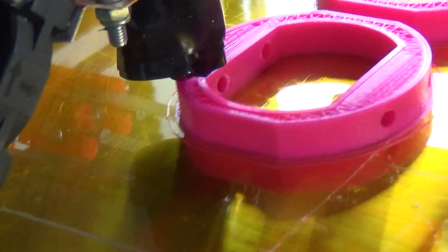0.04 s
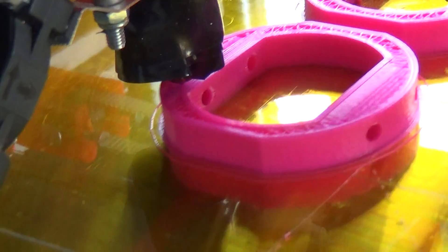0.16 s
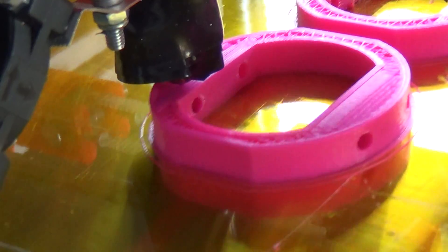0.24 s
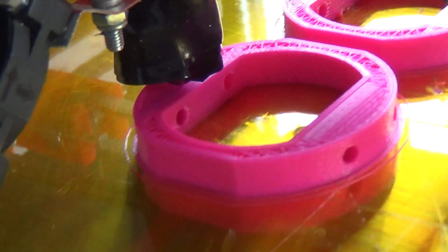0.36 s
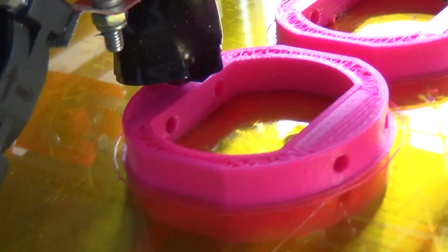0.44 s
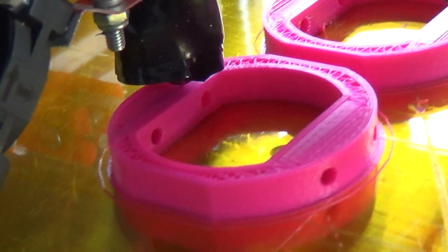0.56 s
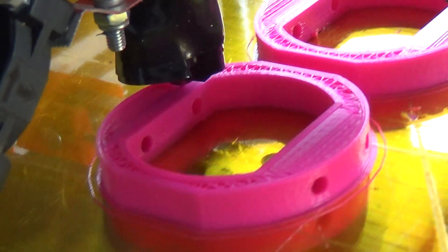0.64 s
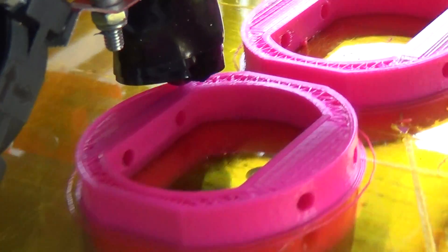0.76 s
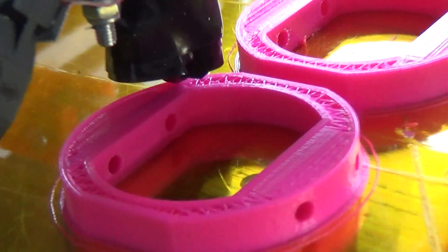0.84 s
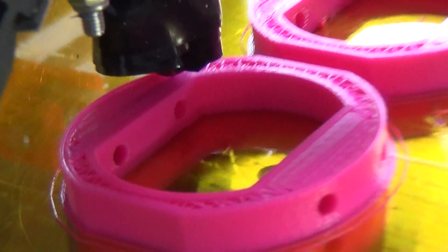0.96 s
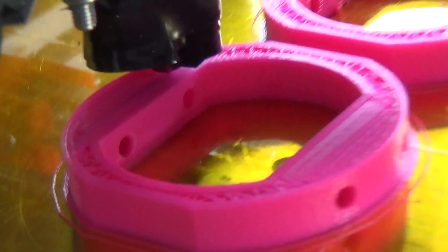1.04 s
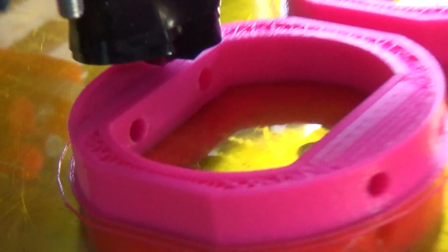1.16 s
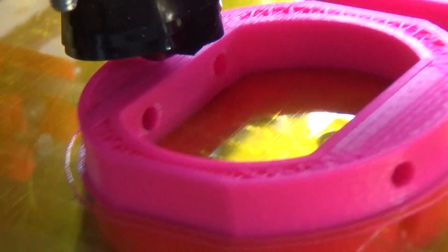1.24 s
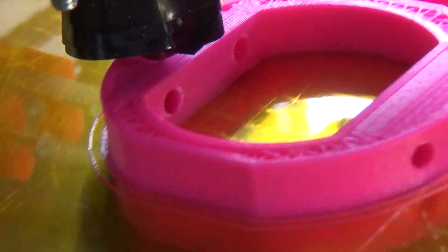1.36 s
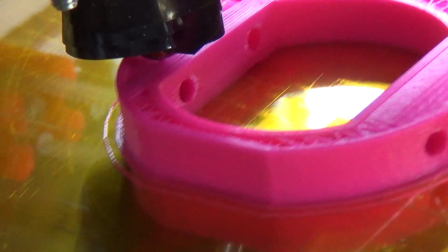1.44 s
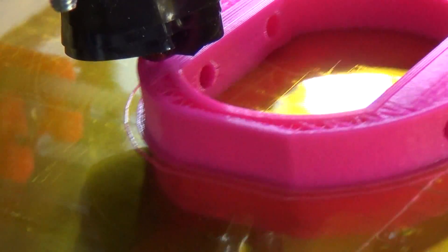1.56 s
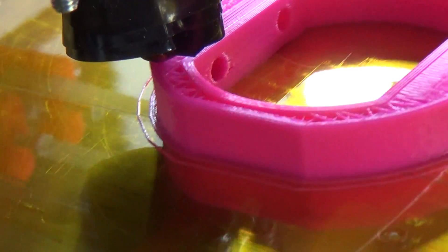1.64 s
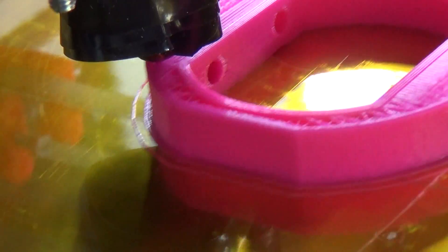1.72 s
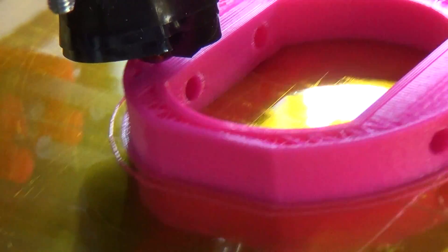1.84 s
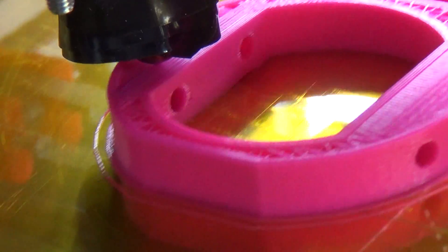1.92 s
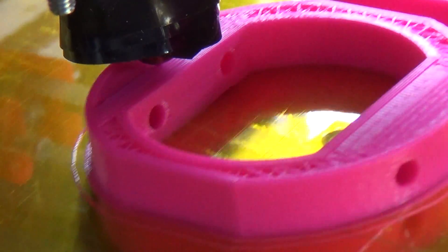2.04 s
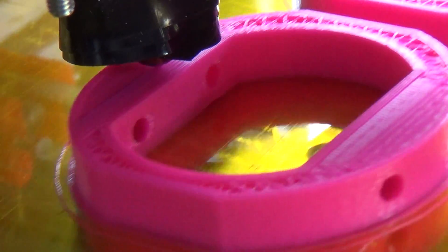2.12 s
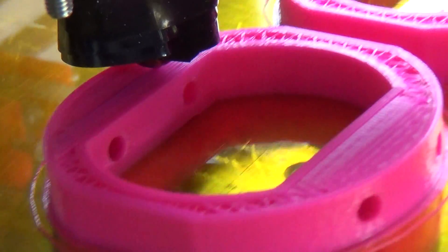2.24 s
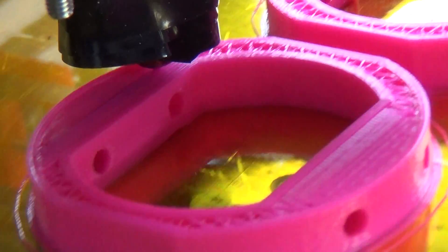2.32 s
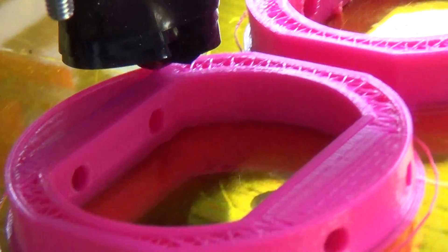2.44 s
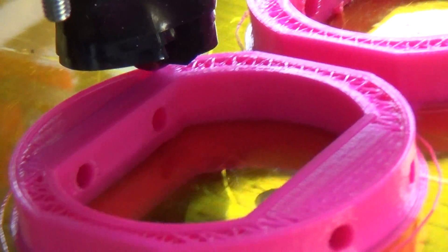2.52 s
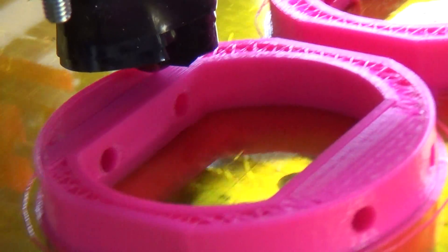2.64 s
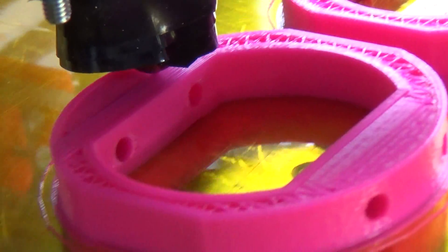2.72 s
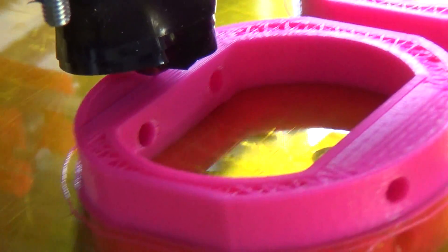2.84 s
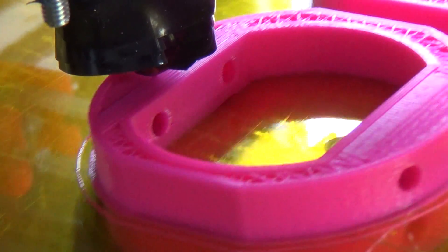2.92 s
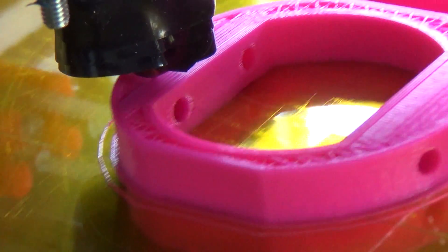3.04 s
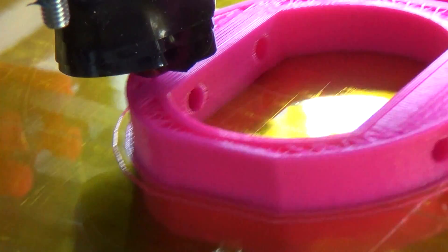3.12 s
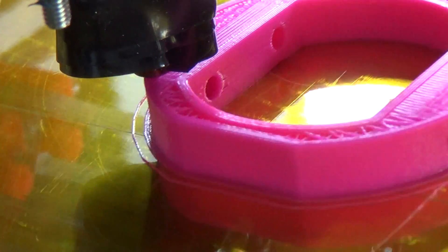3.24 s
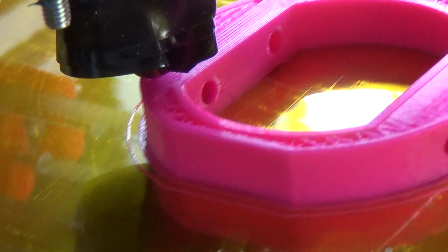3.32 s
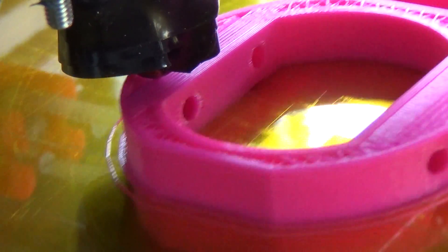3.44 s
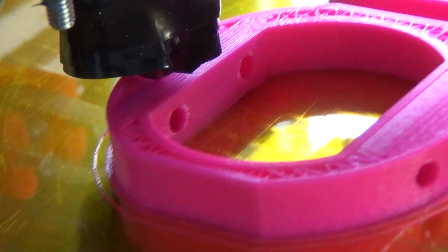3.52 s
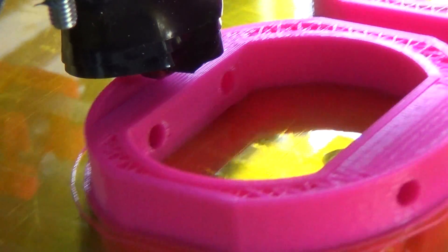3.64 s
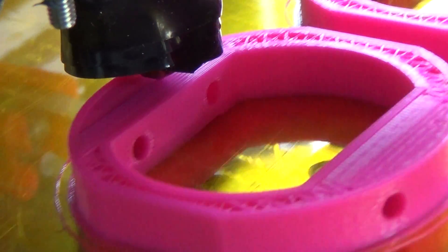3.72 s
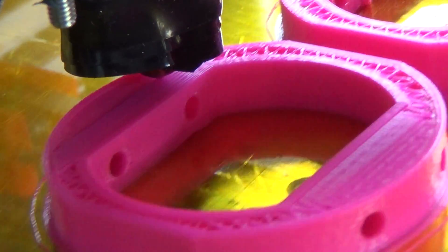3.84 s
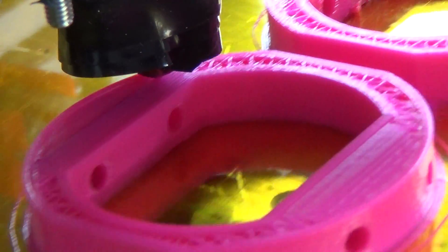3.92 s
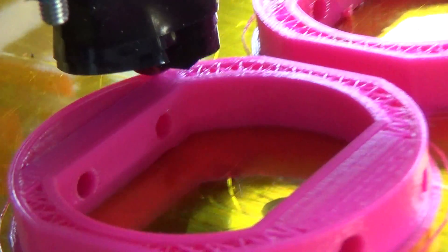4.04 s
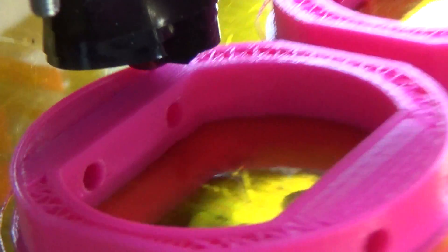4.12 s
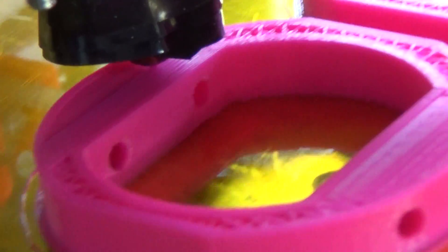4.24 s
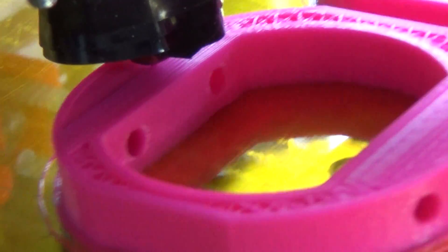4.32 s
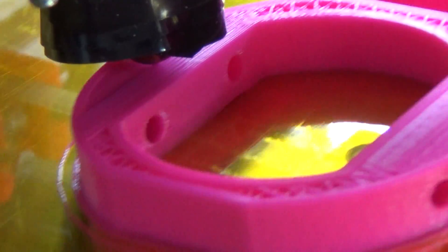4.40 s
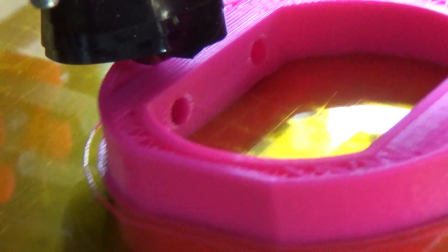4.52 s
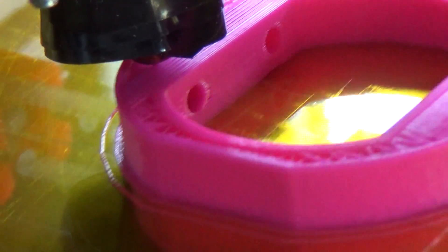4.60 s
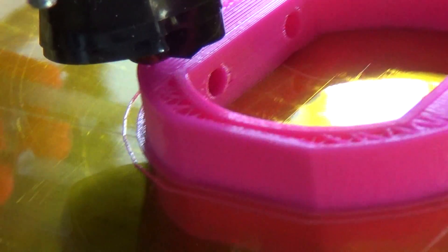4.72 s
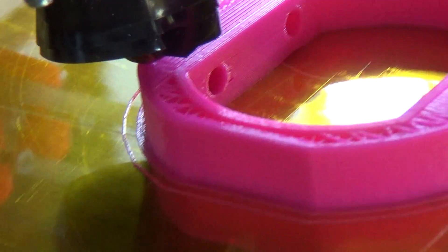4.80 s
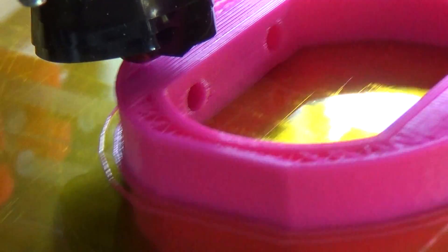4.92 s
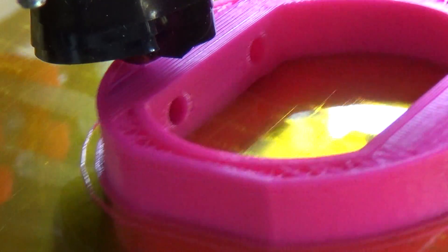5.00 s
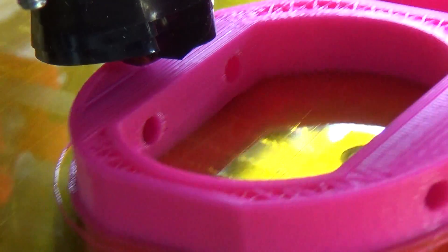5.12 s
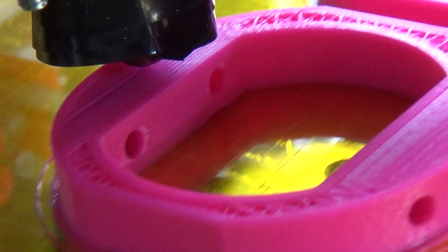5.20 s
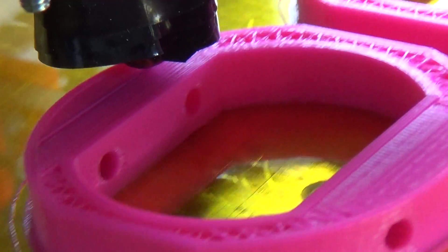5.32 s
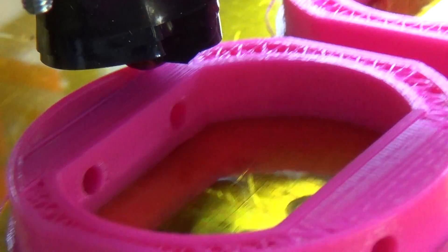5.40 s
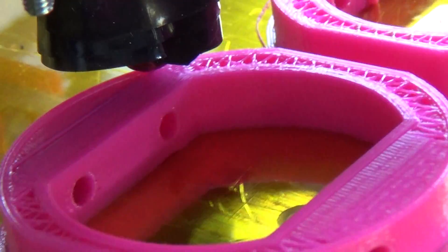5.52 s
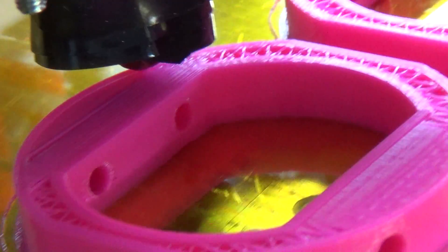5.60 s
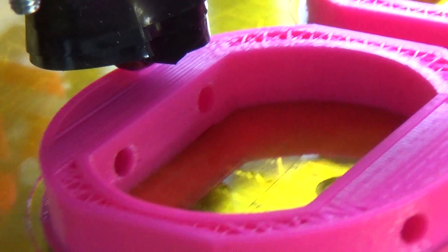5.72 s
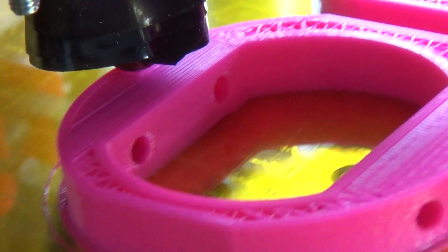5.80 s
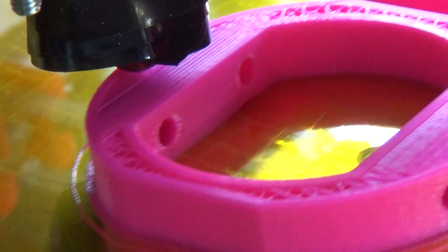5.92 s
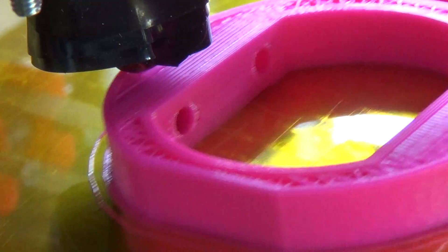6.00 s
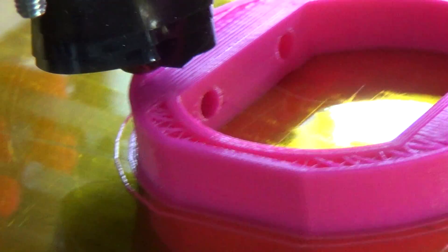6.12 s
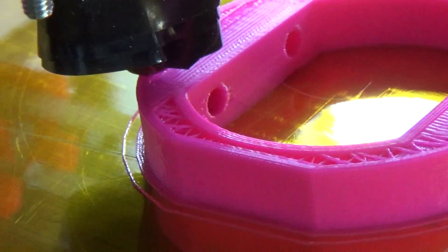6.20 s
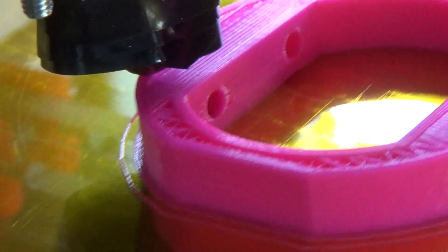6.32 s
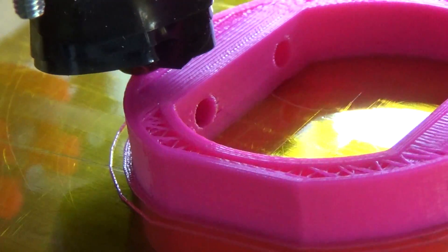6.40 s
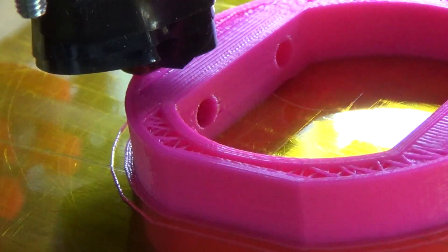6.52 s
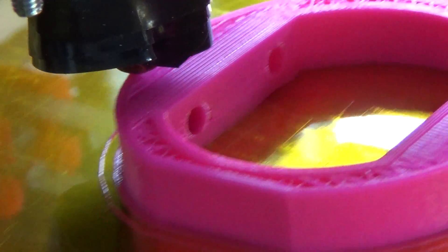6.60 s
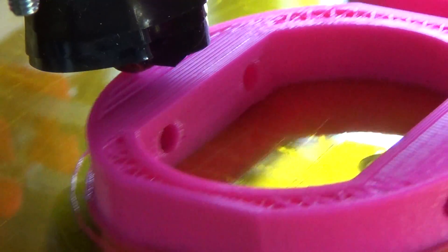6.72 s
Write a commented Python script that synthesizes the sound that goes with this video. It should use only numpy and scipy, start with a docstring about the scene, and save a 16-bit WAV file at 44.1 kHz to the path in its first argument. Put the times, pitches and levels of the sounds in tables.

```python
"""A 3D printer up close

A stepper motor whines through long strokes, gliding down and up in pitch at each turn and shaking the
frame. Near the end come short zigzags and two fast travel moves, the first ending in a clack.
Small metal parts tick; under it all are the rush of the belt, a fine crackle and a hissing fan."""
import sys
import numpy as np
from scipy import signal
from scipy.fft import rfft, irfft
from scipy.io import wavfile
from scipy.ndimage import uniform_filter1d

SR = 44100
rng = np.random.default_rng(int(sys.argv[2]) if len(sys.argv) > 2 else 0)


def generate_wav(sig):
    """Save sig (samples, or channels by samples) to the path in sys.argv[1] as 16-bit PCM at SR."""
    pcm = np.round(np.clip(np.atleast_2d(sig).T, -1, 1) * 32767).astype(np.int16)
    wavfile.write(sys.argv[1], SR, pcm)


N = 297675
T = np.arange(N) / SR
BINS = np.fft.rfftfreq(N, 1 / SR)
CRUISE_HZ = 1455.7  # the motor's step rate at cruising speed
SPURT_PER_S = 12  # share of cruising speed gained per second in a zigzag

# long strokes, out and back by turns: at speed t/s, braking t/s, whine level/dB, hum level/dB
LONG_STROKES = [(0.125, .817, 0.5, 1), (0.969, 1.642, -0.2, 1), (1.79, 2.448, 0, 2),
                (2.605, 3.231, -0.5, 0), (3.382, 3.998, 0.4, 2.5), (4.153, 4.745, -0.5, 0.5),
                (4.918, 5.473, -2.5, -2), (5.702, 6.137, -1, 0), (6.676, 7.3, 0, 2.5)]
# how each stroke out, and each stroke back, swells and fades along the rail:
# share of the stroke, whine level/dB, hum level/dB, whine left minus right level/dB
SWELL_OUT = [(0, -30, -43, -2), (.05, -26.5, -43.5, 0), (.14, -31, -40.5, 2.5), (.22, -30.5, -40, 1.7),
             (.46, -28.5, -38, 1.2), (.7, -31, -36.5, 2.7), (.85, -35.5, -38, 4.5), (.95, -41, -37.5, 7),
             (1, -35, -40.5, 5)]
SWELL_BACK = [(0, -34, -41.5, 4), (.1, -32, -39, 4.5), (.21, -34.5, -35.5, 5), (.33, -29, -35.5, 3),
              (.5, -27.5, -35, 2.5), (.65, -29, -35, 2), (.8, -27, -38.5, 1.4), (.92, -28.5, -36, 1),
              (1, -27, -40.5, 1.5)]
# weaker motor tones at cruising speed: f/Hz, level/dB
MOTOR_TONES = [(452, -53.5), (502, -54.5), (636, -59.5), (820.6, -44.5), (1138.3, -41.5), (1273, -65),
               (1638, -50.5), (1774, -67), (1820, -54), (2093, -66), (2594, -60), (2861, -56.5),
               (2911, -64.5), (3185, -65.5), (3276, -62), (3548, -63), (3770, -62), (4366, -63),
               (7278, -63.5), (8736, -64), (10191, -67), (13090, -79)]
def stepper(speed, hum_hz=273.0, hum_db=-1.5, hum_ring_s=0.02):
    """The motor's pull ripples as it turns, so it sings at pitches that follow its speed, over a hum."""
    phase = angle(CRUISE_HZ * speed) + 0.1 * wander(40)
    whine, hum, cruising = np.zeros((2, N)), np.zeros(N), np.zeros(N)
    for k, (go, brake, stroke_whine_db, stroke_hum_db) in enumerate(LONG_STROKES):
        share, *columns = np.transpose(SWELL_BACK if k % 2 else SWELL_OUT)
        progress = (T - go) / (brake - go)
        whine_curve, hum_curve, pan = (np.interp(progress, share, c) for c in columns)
        on = gate(go, brake, 0.013)
        whine += on * amp(stroke_whine_db) * amp([whine_curve + pan / 2, whine_curve - pan / 2])
        hum += gate(go, brake + hum_ring_s, .025) * amp(stroke_hum_db + hum_curve)
        cruising += on
    out = hum * amp(hum_db + 0.68 * wander(27)) * tone(2 * np.pi * hum_hz * T + .1 * wander(25))
    fade_db = np.interp(T, [0, 6.75], [1.5, -2.5])
    for hz, db in MOTOR_TONES:
        out += cruising * amp(db + fade_db + 1.88 * wander(28)) * tone(phase * hz / CRUISE_HZ)
    out += np.clip(1 - cruising, 0, 1) * motor_glide(speed, phase)
    return out + whine * amp(0.49 * wander(55)) * tone(phase)


# motor tones while the speed changes: multiple of the step rate, level/dB
GLIDE_TONES = [(0.749, -45.5), (1, -34.5), (2, -37)]
def motor_glide(speed, phase, braking_db=1, gaining_db=-3):
    """The motor's tones slide unsteadily, flaring as they pass the pitches at which the frame rings."""
    frame = abs(body(FRAME_RINGS))
    braking = uniform_filter1d(1. * (np.gradient(speed) < 0), size=400)
    out = 0
    for multiple, db in GLIDE_TONES:
        hz = multiple * CRUISE_HZ * speed
        flare = np.interp(hz, BINS, frame) ** 0.39
        treble_loss = np.sqrt(1 + (hz / 2400) ** 8)  # the frame gives off little treble
        level = flare / treble_loss * amp(db + 2.1 * wander(170))
        out += level * tone(phase * multiple + 0.87 * wander(160))
    return out * np.sqrt(speed) * amp(gaining_db + (braking_db - gaining_db) * braking)


# tones of the quick moves: start t/s, at speed t/s, braking t/s, end t/s, step rate f/Hz, level/dB,
# relative level/dB of the octave above
DASH_TONES = [(5.608, 5.622, 5.662, 5.667, 1295, -28.5, -20), (5.61, 5.625, 5.685, 5.69, 3300, -47, -25),
              (6.228, 6.273, 6.303, 6.335, 4075, -41, -8), (6.228, 6.273, 6.303, 6.335, 3580, -48, -20),
              (6.28, 6.292, 6.322, 6.335, 515, -36, -18), (6.345, 6.36, 6.398, 6.41, 520, -33, -12),
              (6.415, 6.428, 6.456, 6.47, 530, -34.5, -14), (6.455, 6.495, 6.527, 6.57, 4075, -41, -9),
              (6.455, 6.495, 6.527, 6.57, 3580, -52, -20), (6.48, 6.505, 6.545, 6.56, 515, -44, -18)]
def dashes():
    """On a quick move the motor gives a rough chirp up, a short whistle and a rough chirp down."""
    out = np.zeros(N)
    for start, fast, brake, end, hz, db, octave_db in DASH_TONES:
        ramping = 1 - gate(fast, brake, 0.0042)
        speed = np.interp(T, [start, fast, brake, end], [.2, 1, 1, .3])
        phase = angle(hz * speed) + (.15 + .6 * ramping) * wander(250)
        level = gate(start, end, .01) * amp(db - 6 * ramping + 1.5 * wander(100))
        out += level * (tone(phase) + amp(octave_db) * tone(2 * phase))
    return out


# tones of the second motor: f/Hz, level/dB
CREEP_TONES = [(52, -64), (104, -61), (156, -50.5), (206, -41.5), (259.5, -42.5), (312, -47), (518, -52),
               (571, -46), (624, -52), (1298, -54), (1351, -46), (1610, -48.5), (1954, -52)]
def creeping_motor(start_s=4.9, end_s=5.48):
    """During one slanted stroke the second motor turns slowly and adds a low buzz."""
    buzz = 0
    for hz, db in CREEP_TONES:
        buzz += amp(db + 1.7 * wander(25)) * tone(angle(hz + 1.47 * wander(12.5)))
    return gate(start_s, end_s, 0.013) * buzz


# where the heavy bed and the light frame ring: f/Hz, width/Hz, level/dB
BED_RINGS = [(162, 10, -8), (216.3, 30.7, 5.5), (261.7, 19.4, -4.5), (338.5, 12, -10.5)]
FRAME_RINGS = [(458, 51, 0.5), (566, 19, 7), (820, 120, -5), (1082, 106, -1.5), (1283, 114, -3.5),
               (1590, 79, -2), (1790, 390, -6.5), (2764, 340, -15), (3286, 77, -12.5)]
# corners, where the print head jolts onto a new course: t/s, thud level/dB, rattle level/dB, hold/s
TURNS = [(.05, -33, -33.5, 0.035), (.888, -30.5, -29.5, 0.017), (1.711, -33.5, -31, 0.017),
         (2.517, -30, -30, 0.021), (3.301, -31.5, -31.5, 0.014), (4.066, -33.5, -29.5, 0.017),
         (4.815, -36, -33, 0.012), (4.843, -29, -30.5, .04), (5.543, -36, -30, 0.017),
         (5.578, -31, -32.5, 0.025), (5.622, -35.5, -34, 0.056), (6.151, -38, -29.5, .028),
         (6.195, -30, -34, .012), (6.218, -32, -31.5, 0.0072), (6.336, -38, -31.5, 0.024),
         (6.369, -44, -30.5, .015), (6.405, -34.5, -35, .02), (6.446, -32, -36, 0.0063),
         (6.573, -35, -32.5, 0.024), (6.612, -35, -31, .045)]
def shaking(speed, strain_db=-37, knocks_per_s=2000):
    """Each corner jolts the bed and the frame; the frame also rattles under any change of speed."""
    steps = pulses(CRUISE_HZ * speed * (1 + .05 * wander(150)))

    def knocks():
        return white() * (rng.random(N) < knocks_per_s / SR)

    def shaken(rings):
        """A slow motor jerks from step to step, so the part growls, along with loose chatter."""
        response = body(rings)
        growl = unit(irfft(rfft(steps) * response, N))
        ringing = growl + stereo_noise(knocks, response)
        power = abs(uniform_filter1d(ringing[0] ** 2, size=700))
        return unit(ringing / np.sqrt(power + .05))  # each jerk moves the part about equally far

    thud_power, rattle_power = 0, 0
    for s, thud_db, rattle_db, hold_s in TURNS:
        thud_power += (amp(thud_db) * jolt(s, hold_s, rise_s=0.006, fall_db_per_s=269)) ** 2
        rattle_power += (amp(rattle_db) * jolt(s, hold_s, rise_s=0.013, fall_db_per_s=191)) ** 2
    strain = uniform_filter1d(np.minimum(abs(np.gradient(speed, T)) / SPURT_PER_S, 1), size=900)
    rattle_power += (amp(strain_db) * strain) ** 2
    thud = np.sqrt(thud_power) * shaken(BED_RINGS)
    rattle = amp(1.07 * wander(79)) * np.sqrt(rattle_power) * shaken(FRAME_RINGS)
    return thud + rattle


def head_speed(crawl=.15, opening=.78, zigzag_s=.06):
    """The print head's speed (1 is cruising): a crawl at each corner, spurts between close corners."""
    corners = [row[0] for row in TURNS]
    points = [(0.00061, opening)] + [(s, crawl) for s in corners]
    points += [(s, 1) for go, brake, *_ in LONG_STROKES for s in (go, brake)]
    for a, b in zip(corners, corners[1:]):
        if b - a < zigzag_s:
            points.append(((a + b) / 2, crawl + SPURT_PER_S * (b - a) / 2))
    return np.interp(T, *np.transpose(sorted(points)))


def hard_stop(at_s=6.3355, peak_db=-19):
    """The first fast travel move ends with a clack of the whole frame."""
    blow = np.zeros(N)
    add(blow, at_s, rng.standard_normal(900) * np.exp(-T[:900] / .005))
    clack = irfft(rfft(blow) * body(FRAME_RINGS), N)
    return amp(peak_db) * clack / abs(clack).max()


# sharp ticks: t/s, peak level/dB, treble level/dB (higher against the peak means brighter)
SNAPS = [(0.7863, -31.5, -49), (0.9116, -31, -26), (0.992, -18, -26), (1.0958, -19, -26), (1.407, -25, -41),
         (1.511, -22.5, -39), (2.721, -32, -28), (3.353, -22, -31), (4.1981, -23, -29), (4.844, -28, -40),
         (4.924, -17.5, -24), (5.1627, -27, -38), (5.6079, -11.5, -19), (5.6366, -18.5, -24),
         (5.7104, -18, -25), (6.1702, -18, -26), (6.2718, -25, -38), (6.3331, -24, -27), (6.526, -26, -33),
         (6.6151, -21.5, -33)]
# what each tick rings with: f/Hz, level/dB, time to fade by 60 dB/s
SNAP_RINGS = [(4290, -10, 0.018), (4400, 0, 0.0055), (5280, -1.5, 0.0067), (6000, 3, 0.0039),
              (6650, -2.5, 0.0048), (7680, -4, 0.0057), (8060, -5, 0.0029), (10460, -14, 0.011)]
def ticks(splash_db=-13, splash_s=0.018):
    """Small metal parts tick, each with its own loudness and brightness, followed by a short splash."""
    out, t = np.zeros(N), T[:1300]
    for s, peak_db, treble_db in SNAPS:
        bright_db = np.clip(treble_db - peak_db + 11, -14, 8)
        ring = 0
        for hz, db, fade_s in SNAP_RINGS:
            grit = 0.91 * unit(uniform_filter1d(rng.standard_normal(len(t)), size=30))
            highness = np.clip(np.log2(hz / SNAP_RINGS[0][0]) * 2, 0, 1)
            level = amp(db + bright_db * highness - 60 * t / fade_s)
            cycles = hz * rng.normal(1, 0.0094) * t + rng.random()
            ring += level * np.sin(2 * np.pi * cycles + grit)
        ring *= 1 - np.exp(-(t / 0.00093) ** 2)  # soften the start
        add(out, s, amp(peak_db) * ring / abs(ring).max())
    # nearby surfaces scatter the splash
    scatter = np.diff(rng.standard_normal(len(t)), prepend=0) * np.exp(-t / splash_s)
    return out + amp(splash_db) * signal.oaconvolve(out, scatter / np.linalg.norm(scatter))[:N]


# ringing stirred by the belt and bearings: f/Hz, width/Hz, level/dB
RAIL_RINGS = [(261, 95, 3), (698, 330, -10.5), (1020, 380, -6.5), (1490, 230, 0), (1950, 360, -2),
              (2856, 75, -5), (3845, 610, -11.5)]
def rails(level_db=-41):
    """The belt and bearings make a constant rush whose level flickers."""
    return amp(level_db + 2.3 * wander(39)) * stereo_noise(white, body(RAIL_RINGS))


# the fan's stronger tone, an octave above its blade tone: t/s, f/Hz
FAN_OCTAVE = [(0, 1075), (1.4, 1081), (2.3, 1076), (3.8, 1086), (5.1, 1092), (6.75, 1102)]
# the colour of the fan's hiss: f/Hz, level/dB
FAN_HISS = [(25, -15), (50, -9.5), (80, -11), (115, -11), (220, 3.5), (380, -2.5), (520, -5.5), (750, 1.5),
            (1500, -1.5), (2500, -9), (4100, -10.5), (4800, -13), (8500, -13), (9900, -11), (11000, -15.5),
            (14000, -21)]
# faint steady tones of fans and electronics: f/Hz, level/dB
STEADY_TONES = [(77.5, -61), (15625, -73)]
def fan(air_db=-40, blade_db=-52, octave_db=-46):
    """Moving air hisses and the passing blades sing two wavering tones, over faint steady ones."""
    phase = angle(np.interp(T, *np.transpose(FAN_OCTAVE)) / 2 + 1.86 * wander(11.6))
    blades = amp(blade_db + 2 * wander(8.5)) * tone(phase)
    blades += amp(octave_db + 2 * wander(28)) * tone(2 * phase)
    steady = sum(amp(db) * tone(2 * np.pi * hz * T) for hz, db in STEADY_TONES)
    hiss = amp(air_db + 1.05 * wander(24)) * stereo_noise(white, amp(spectrum(FAN_HISS)))
    return hiss + blades + steady


def crackle(level_db=-50.5, clicks_per_s=36, strays_per_s=60, stray_db=-6):
    """Tiny high clicks at a loose beat, perhaps from a bearing, with weaker strays between."""
    clicks = pulses(clicks_per_s * np.clip(1 + .15 * wander(30), .3, 2))
    clicks += amp(stray_db) * (rng.random(N) < strays_per_s / SR)
    clicks *= amp(4.5 * np.clip(white(), -3, 1.6))
    chatter = signal.oaconvolve(clicks, np.exp(-T[:400] / 0.0007))[:N] * white()
    response = body([(9800, 1100, 0), (12800, 1500, -21)])
    return amp(level_db) * unit(irfft(rfft(chatter) * response, N))


# how alike the two sides of a noise are: f/Hz, likeness (1 is the same)
LIKENESS = [(60, .84), (220, .92), (500, .7), (1000, .68), (2000, .8), (3000, .75), (5000, .85),
            (9000, .92), (13000, .99)]
def stereo_noise(draw, response):
    """Two partly alike channels of the noise that draw() makes, coloured by a response."""
    middle, side = rfft(draw()), rfft(draw())
    same = spectrum(LIKENESS)
    side *= np.sqrt((1 - same) / (1 + same))
    return unit(irfft(np.array([middle + side, middle - side]) * response, N))


# how much louder the left side is: f/Hz, level/dB
LEFT_LOUDER = [(60, 2.5), (190, 3.2), (275, 2.2), (500, -.3), (820, -.3), (1080, -1.6), (1140, -.2),
               (1650, 0), (2000, -1.1), (4000, .1), (15000, 0)]
# how far the left side runs ahead: f/Hz, phase/radians
LEFT_AHEAD = [(160, .15), (275, .03), (800, .24), (1250, .25), (1455, .09), (2000, 0), (3000, .14),
              (4500, 0)]
def lean_sideways(mix):
    """Each pitch range leans a little to one side."""
    lean = amp(spectrum(LEFT_LOUDER) / 2) * np.exp(.5j * spectrum(LEFT_AHEAD))
    return irfft(rfft(mix) * np.array([lean, 1 / lean]), N)


def body(rings):
    """How a part with rings (f/Hz, width/Hz, level/dB) answers each pitch, with the deep bass cut away."""
    bass_cut = 1 - 1 / (1 + (BINS / 90) ** 4)
    return bass_cut * sum(amp(db) / (1 + 1j * (BINS - hz) / (0.74 * width)) ** 2 for hz, width, db in rings)


def jolt(start_s, hold_s, rise_s, fall_db_per_s):
    """The level of one jolt: it rises, holds and dies away."""
    age = T - start_s
    return np.clip(age / rise_s, 0, 1) * amp(-fall_db_per_s * np.clip(age - rise_s - hold_s, 0, 1))


def spectrum(points):
    """Joins (f/Hz, value) points with straight lines along a pitch scale."""
    hz, value = np.transpose(points)
    return np.interp(np.log(BINS + 1), np.log(hz + 1), value)


def wander(rate):
    """A smooth random wobble of size one, changing about rate times a second."""
    return unit(irfft(rfft(white()) * np.exp(-(BINS / rate) ** 2), N))


def gate(start, end, edge):
    """One between two times and zero outside, with soft edges."""
    return np.clip(np.minimum(T - start, end - T) / edge + .5, 0, 1)


def pulses(hz):
    """One click for each turn of a cycle."""
    return np.diff(np.floor(np.cumsum(hz) / SR + rng.random()), prepend=0)


def angle(hz):
    """The running phase of a changing pitch, from a random start."""
    return 2 * np.pi * (np.cumsum(hz) / SR + rng.random())


def tone(phase):
    return np.sqrt(2) * np.sin(phase)


def white():
    return rng.standard_normal(N)


def amp(db):
    return 10 ** (np.asarray(db) / 20)


def unit(x):
    return x / np.sqrt(np.mean(x ** 2) + 1e-20)


def add(mix, s, sound):
    part = mix[max(round(s * SR), 0):][:len(sound)]
    part += sound[:len(part)]


def scene():
    """All parts of the printer together; the head's speed drives the stepper and the shaking."""
    speed = head_speed()
    motors = stepper(speed) + dashes() + creeping_motor()
    return lean_sideways(motors + shaking(speed) + rails() + fan() + crackle() + ticks() + hard_stop())


def record(dry, cutoff_hz=15800):
    """Cuts away the very highest treble."""
    lowpass = signal.firwin(511, cutoff_hz, window=("kaiser", 9), fs=SR)
    return signal.oaconvolve(dry, lowpass[None], "same")


dry = scene()
out = record(dry)
generate_wav(out)
```